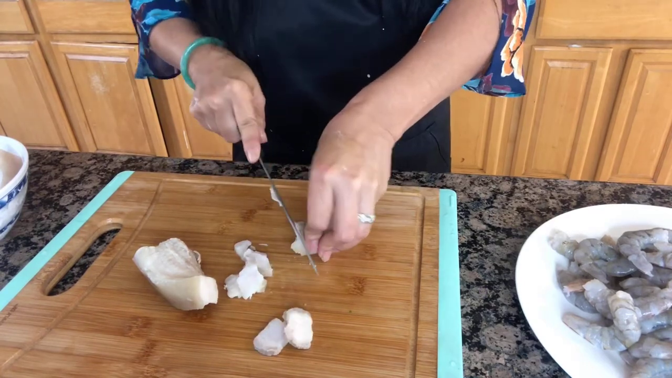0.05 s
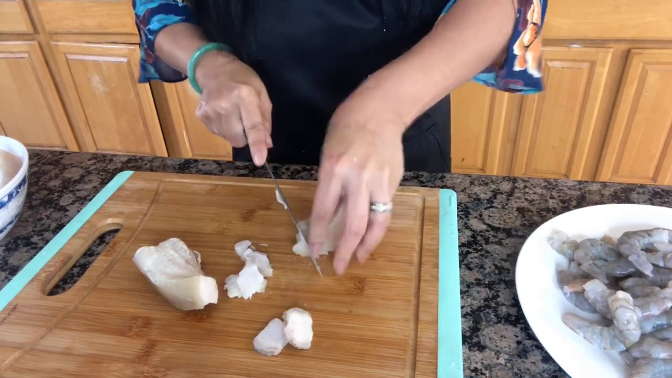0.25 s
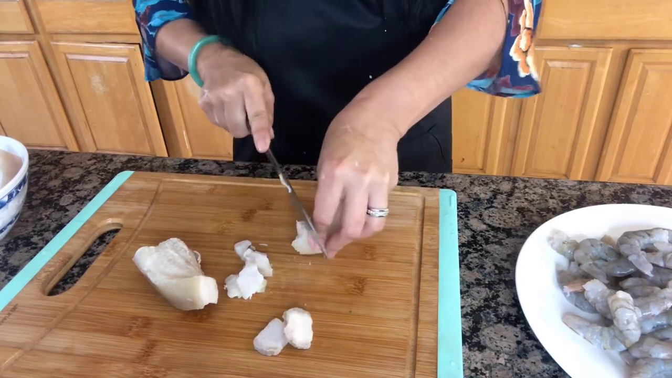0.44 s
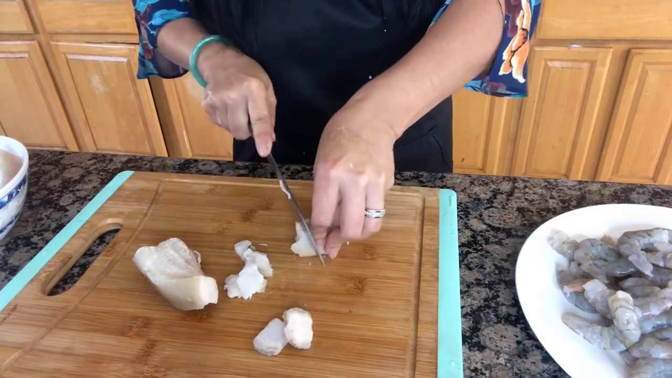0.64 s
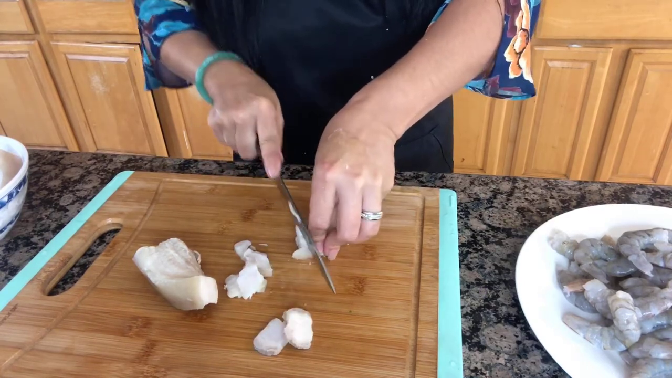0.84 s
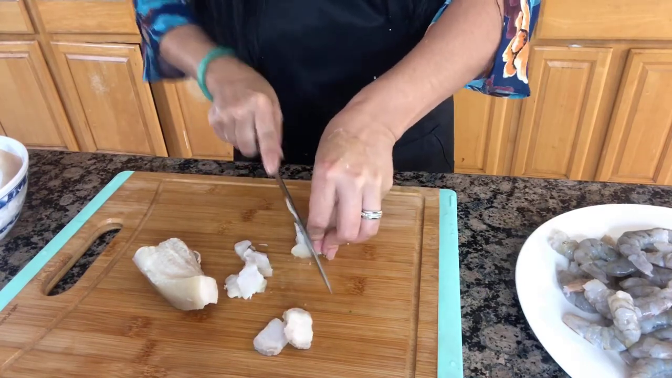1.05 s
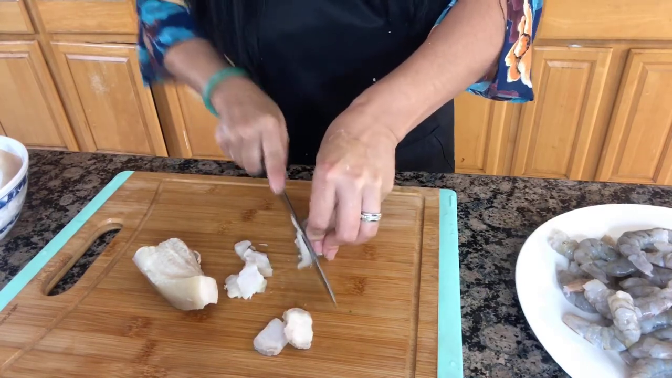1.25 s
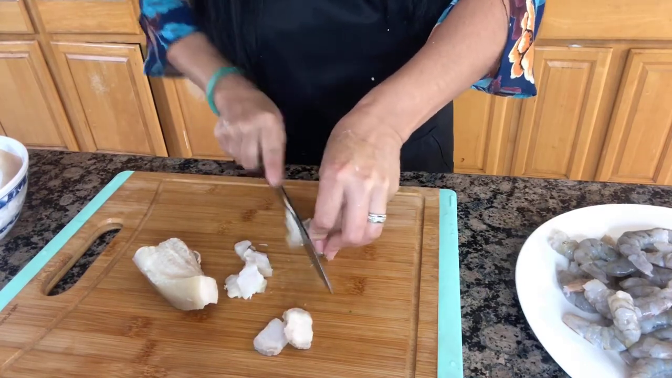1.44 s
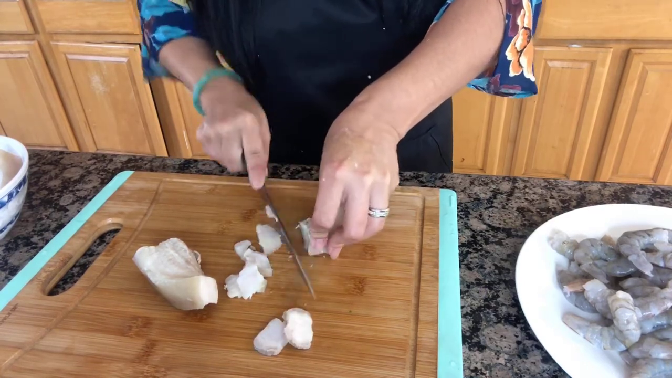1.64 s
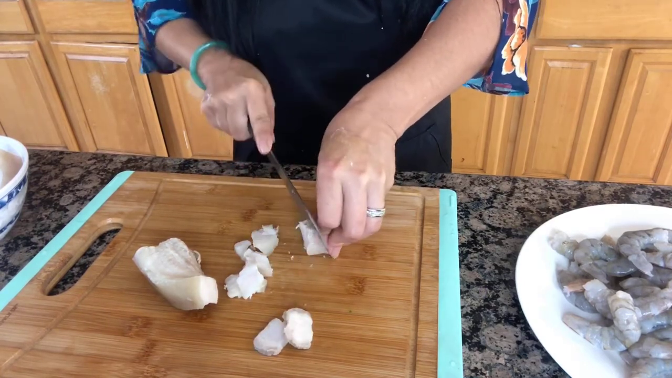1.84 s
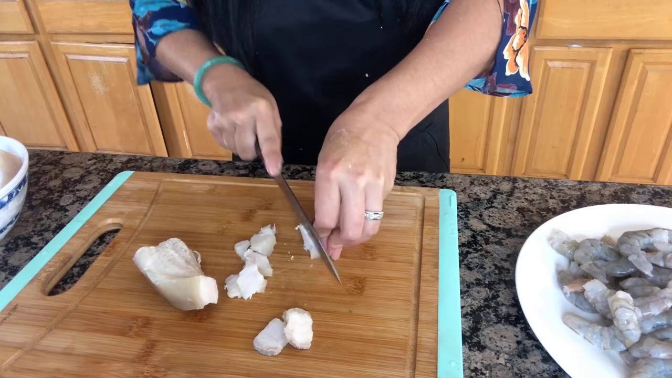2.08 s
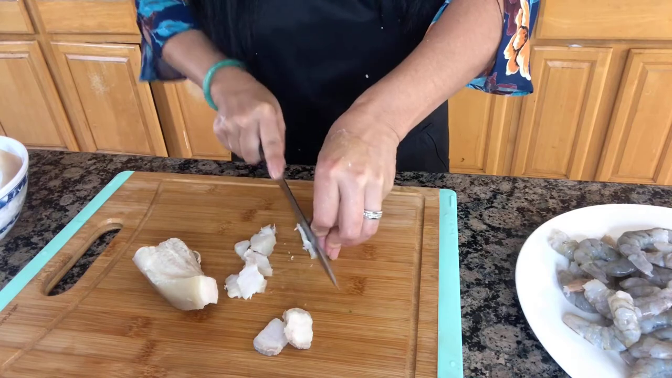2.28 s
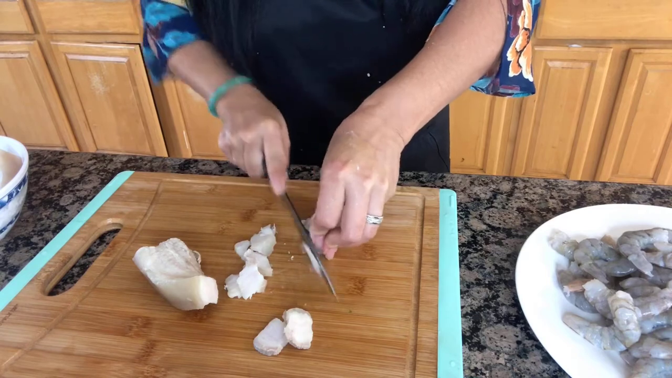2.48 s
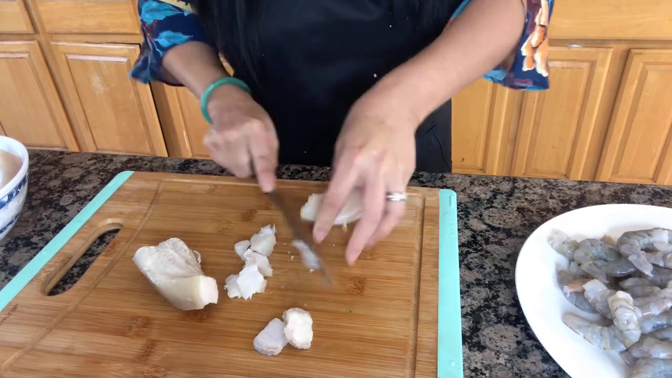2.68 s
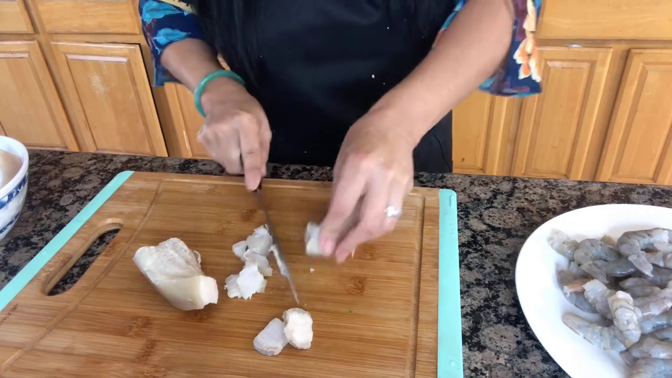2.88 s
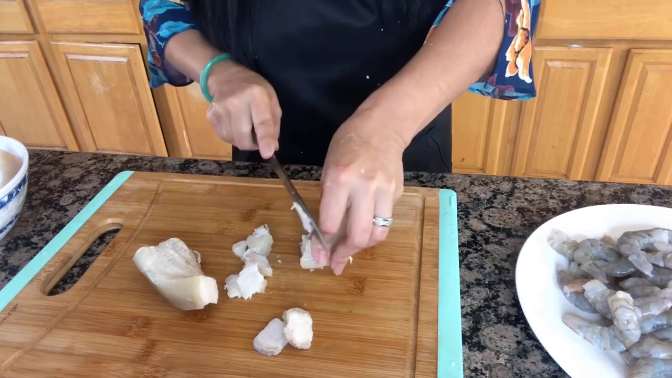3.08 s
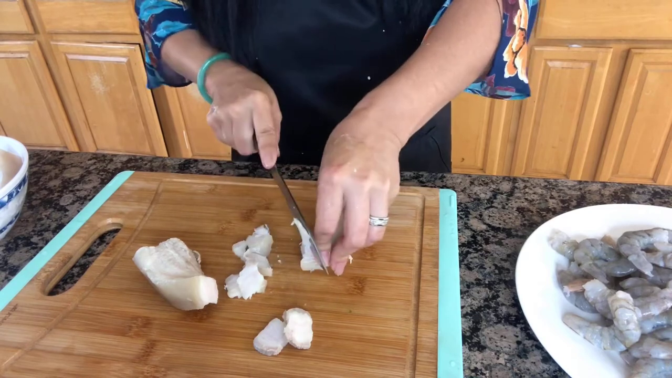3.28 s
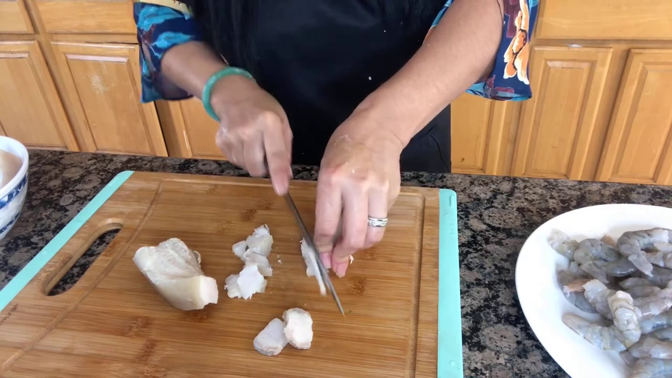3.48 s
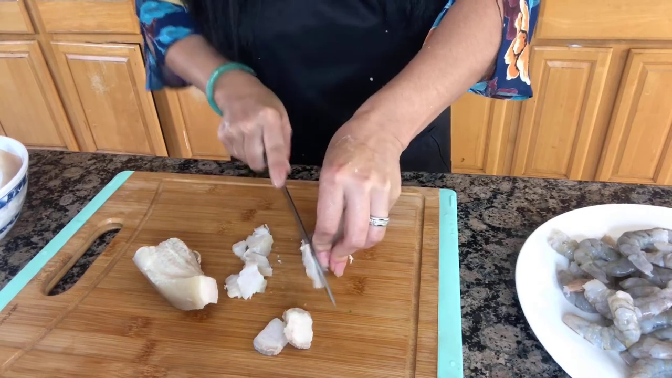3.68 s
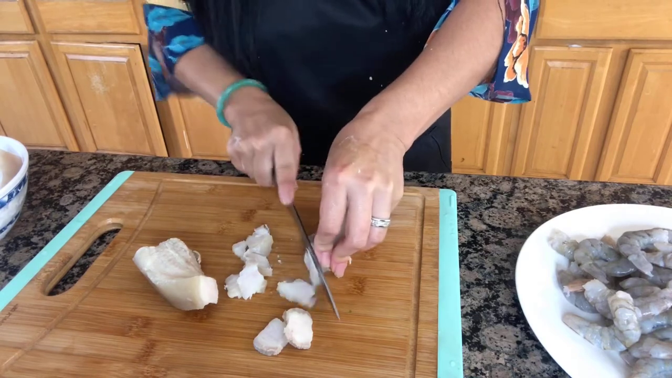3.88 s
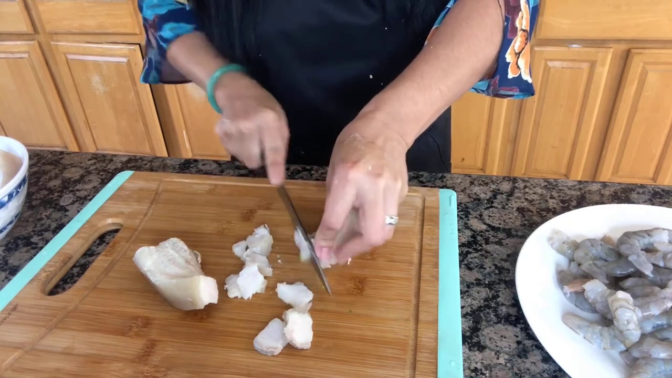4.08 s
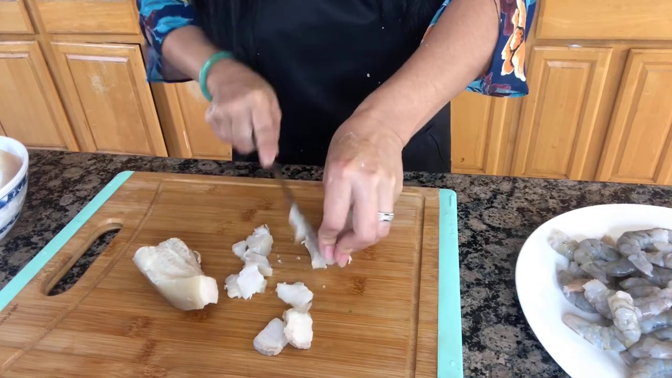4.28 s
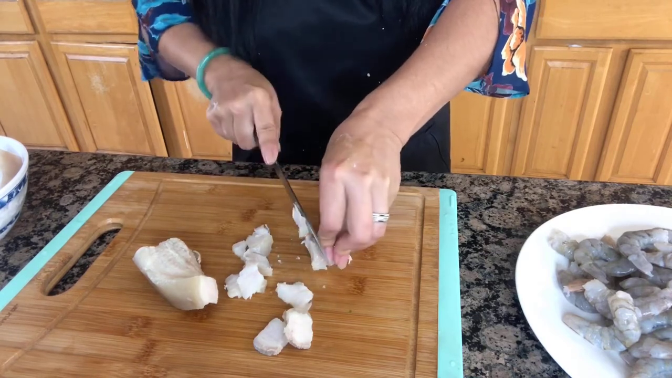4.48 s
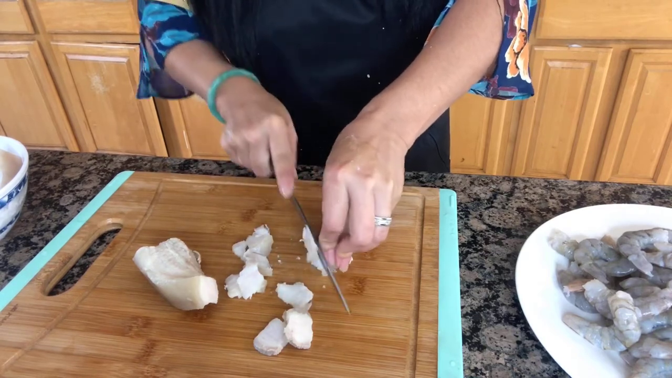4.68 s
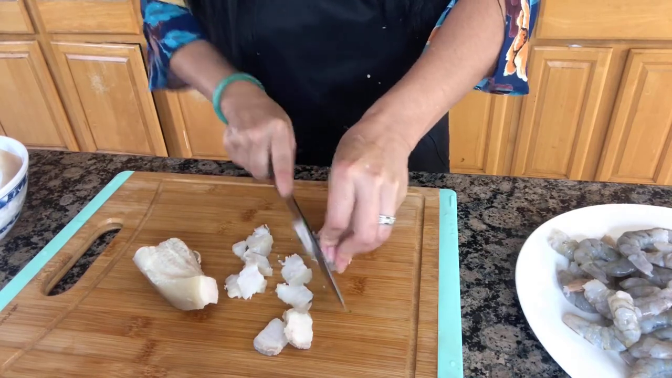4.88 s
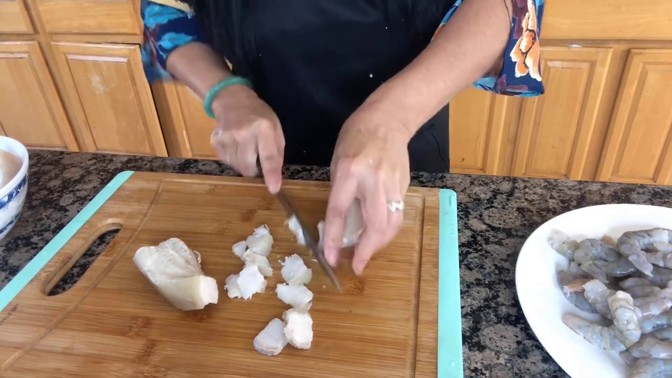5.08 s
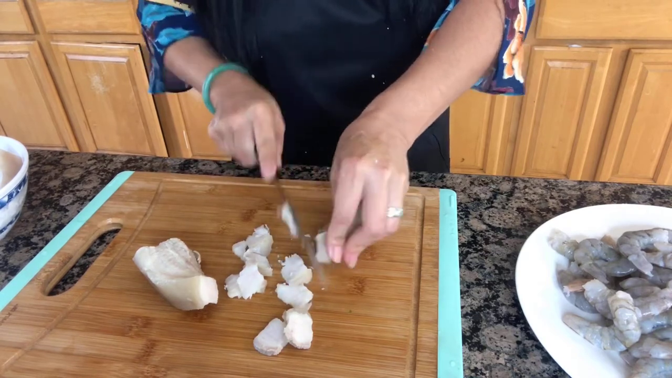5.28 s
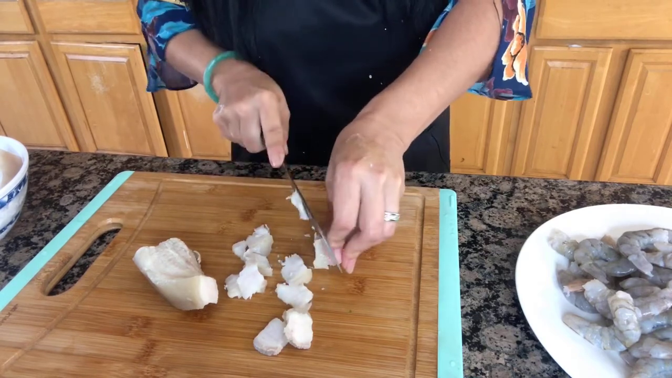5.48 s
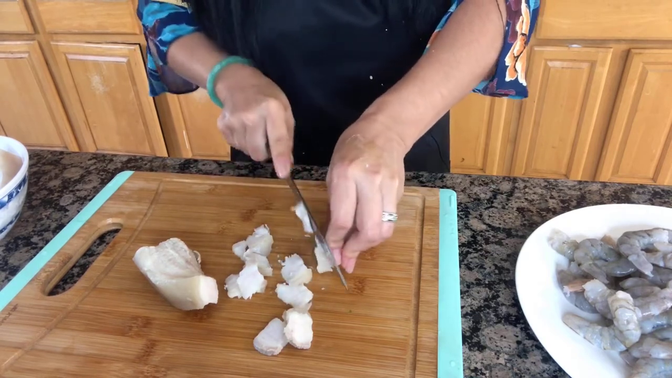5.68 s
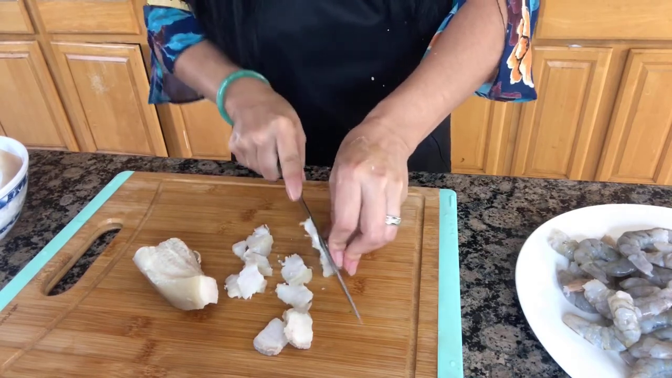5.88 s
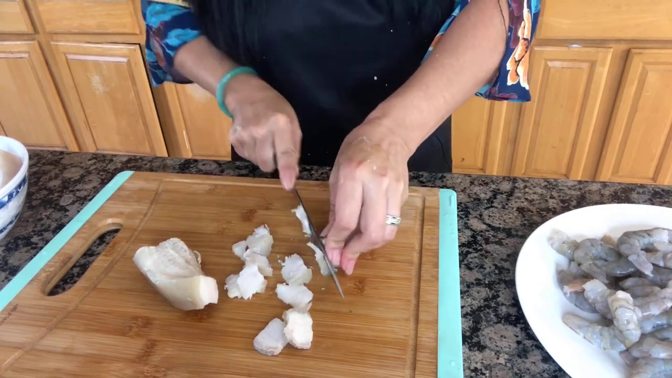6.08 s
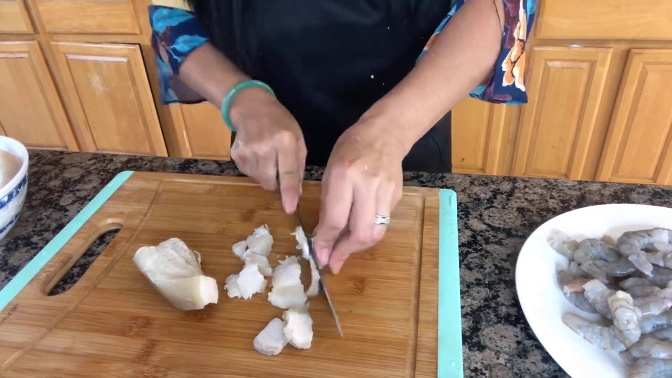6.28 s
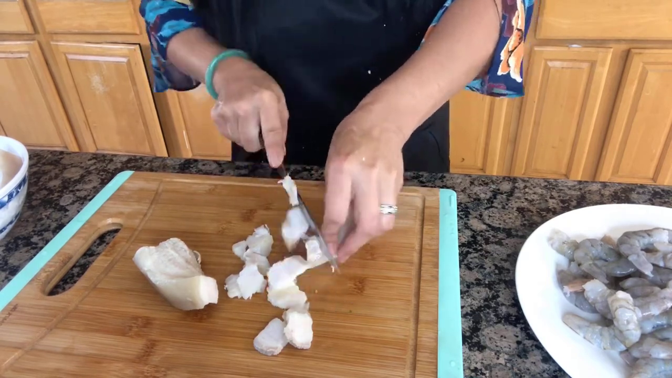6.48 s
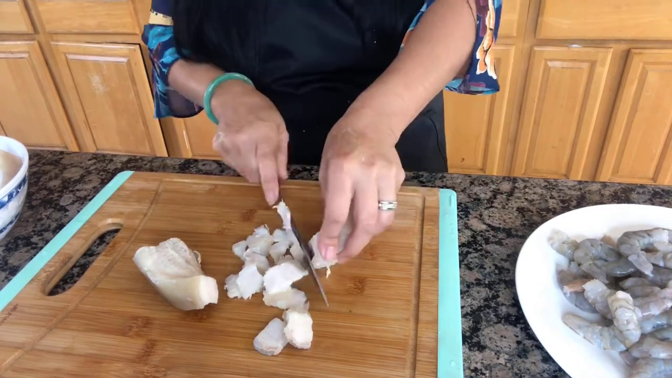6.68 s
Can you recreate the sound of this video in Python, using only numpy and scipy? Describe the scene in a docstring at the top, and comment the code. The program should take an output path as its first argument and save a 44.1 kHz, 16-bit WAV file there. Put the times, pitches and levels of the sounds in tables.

```python
"""Knife work on a bamboo board

A chef's knife slices cooked pork in a kitchen, over a faint appliance hum of noise and wavering tones.
Parting fibres are random impulses (a soft wet crackle); the edge meeting the wood excites modes (a knock);
stick-slip drives resonances as the edge scrapes to and fro. Crackle and scrape follow the blade's speed.
All sound stops shortly before the end."""
import sys
import numpy as np
from scipy import signal
from scipy.fft import rfft, irfft
from scipy.io import wavfile
from scipy.ndimage import map_coordinates

SR = 44100
rng = np.random.default_rng(int(sys.argv[2]) if len(sys.argv) > 2 else 0)


def unload_wav(signal):
    """Save mono or channel-first audio to the path in sys.argv[1] as 16-bit WAV at rate SR, clipped to [-1, 1]."""
    wavfile.write(
        sys.argv[1],
        SR,
        np.round(np.clip(np.atleast_2d(signal).T, -1, 1) * 32767).astype(np.int16),
    )


N = 297228
TIME = np.arange(N) / SR  # s


def gain_of(db):
    """Logarithmic level: decibels to amplitude."""
    return 10 ** (np.asarray(db) / 20)


def evened(x):
    """Normalization: scales to rms 1."""
    return x / np.sqrt(np.mean(x ** 2) + 1e-20)


def read(points, hz):
    """Logarithmic pitch: interpolates a table on a log-frequency axis."""
    f, value = np.transpose(points)
    return np.interp(np.log(hz + 1), np.log(f + 1), value)


def add(mix, s, sound):
    """Superposition: adds a sound to the mix from time s [s]."""
    part = mix[round(s * SR):][:len(sound)]
    part += sound[:len(part)]


def filtered(x, hz, kind, order=2):
    """Causal filtering: a Butterworth low-pass or high-pass."""
    corner_hz = min(hz, SR / 2 - 1)
    return signal.sosfilt(signal.butter(order, corner_hz, kind, fs=SR, output="sos"), x)


def tinted(x, spectrum):
    """Spectral shaping: weights a steady signal by frequency, at rms 1."""
    size = x.shape[-1]
    gain = gain_of(read(spectrum, np.fft.rfftfreq(size, 1 / SR)))
    return evened(irfft(rfft(x) * gain, size))


def drift(rate_hz, size=N):
    """Random modulation: a slow interpolated random curve at about rms 1."""
    steps = np.arange(size) * 2 * rate_hz / SR
    knots = rng.standard_normal(4096)
    return np.sqrt(3 / 2) * np.interp(steps, np.arange(len(knots)), knots)  # interpolation lowers the rms


# Left-right likeness of the background noise: (frequency [Hz], likeness [0-1])
LIKENESS = [(30, 0.37), (150, 0.97), (300, 0.2), (700, 0.68), (1500, 0.79), (5000, 0.76), (15000, 0.28)]


def noise_pair(spectrum):
    """Partial coherence: left and right noise share a frequency-dependent part."""
    same = np.clip(read(LIKENESS, np.fft.rfftfreq(N, 1 / SR)), 0, 1)
    left, other = rfft(rng.standard_normal((2, N)))
    right = same * left + np.sqrt(1 - same ** 2) * other
    return tinted(irfft(np.array([left, right]), N), spectrum)


# Spectrum of the rushing air: (frequency [Hz], relative density [dB per Hz])
AIR_SPECTRUM = [(74, -36), (125, -6), (147, 0), (216, -9), (244, -4), (359, -6), (528, -8), (661, -14),
                (914, -11), (1260, -14), (2280, -32), (3350, -30), (3860, -34), (14800, -43), (16000, -48)]
# Hum lines of the appliance: (frequency [Hz], relative level [dB])
HUM_LINES = [(39, -73), (59.2, -63), (119, -71.5), (146, -92), (157, -60), (196, -67.5), (296, -59),
             (355, -60.5), (533, -72), (710, -63.5), (920, -70.5)]
# Faint deep rumble that comes and goes: (time [s], level [dB])
RUMBLE_LEVEL = [(0.0, -65), (0.07, -61), (1.12, -64), (1.53, -56), (2.16, -58.5), (2.63, -43.5),
                (3.26, -58), (3.57, -56), (3.91, -62), (3.99, -52), (4.23, -48), (4.48, -58), (5.13, -48.5),
                (5.37, -53), (5.79, -56), (6.1, -63)]
# Spectra of drone and rumble: (frequency [Hz], relative density [dB per Hz])
DRONE_SPECTRUM = [(10, -11), (40, -3.5), (65, -0.5), (100, 0), (400, -28), (2000, -78.5)]
RUMBLE_SPECTRUM = [(5, -13.5), (15, 0.5), (30, -15), (70, -27.5), (300, -67.0)]


def background(air_db=-45, hum_db=-1, waver_hz=1.3, drone_db=-67):
    """Broadband and tonal noise: an appliance's air, drone and wavering hum, over a deep rumble."""
    out = gain_of(air_db) * noise_pair(AIR_SPECTRUM) + gain_of(drone_db) * noise_pair(DRONE_SPECTRUM)
    for hz, db in HUM_LINES:
        level = gain_of(db + hum_db + 2 * drift(rate_hz=6.3))
        turns = np.cumsum(hz + waver_hz * drift(rate_hz=12)) / SR
        out = out + level * np.sqrt(2) * np.sin(2 * np.pi * turns)
    rumble_db = np.interp(TIME, *np.transpose(RUMBLE_LEVEL))
    return out + noise_pair(RUMBLE_SPECTRUM) * gain_of(rumble_db)


def slips(per_s, spread_db, size=N):
    """Random point process: a train of tiny impulses of uneven size and either sign."""
    height = gain_of(spread_db * np.minimum(rng.exponential(1, size), 4))
    return height * rng.choice([-1, 1], size) * (rng.random(size) < per_s / SR)


def speed(rise_s, fall_s):
    """Stroke kinematics: blade speed, 0-1, gathers from rest and slows to rest along a sine."""
    t = np.arange(0, rise_s + fall_s, 1 / SR)
    return np.sin(np.interp(t, [0, rise_s, rise_s + fall_s], [0, np.pi / 2, np.pi]))


# Loudest small snaps and ticks: wet meat, and bright ticks as the edge lands:
# (time [s], peak level [dB], lowest frequency [Hz], highest frequency [Hz], decay constant [s])
SNAPS_AND_TICKS = [(0.137, -35, 8500, 16000, 0.0023), (0.218, -42, 1930, 4940, 0.013),
                   (0.274, -40.5, 1960, 5470, .005), (0.3, -44, 9000, 16000, .003),
                   (1.0175, -34.5, 4000, 14100, .0015), (1.1008, -33.5, 2500, 8750, 0.0012),
                   (1.1868, -33, 1640, 7000, 0.00083), (1.2291, -18, 6800, 14600, 0.0007),
                   (1.2379, -18.5, 4000, 15000, 0.00066), (2.2973, -26, 1500, 7000, 0.00093),
                   (3.797, -37, 1500, 5970, .002), (3.858, -26, 1490, 4520, .003),
                   (3.8629, -14, 2500, 12200, 0.00097), (5.717, -41, 10000, 16000, .001)]
# Passes of the blade through the meat:
# (start [s], speeding up [s], slowing down [s], relative crackle level [dB])
MEAT_PASSES = [(.6, 0.14, .1, -64.5), (1.015, 0.039, .085, -51.5), (1.11, .1, 0.043, -51),
               (1.96, .12, 0.14, -62.5), (2.245, 0.098, 0.037, -45), (3.38, 0.066, .12, -65),
               (3.575, .11, 0.091, -53.5), (3.755, 0.041, 0.16, -50.5), (4.49, 0.12, 0.1, -58),
               (4.665, 0.046, 0.013, -48), (5.52, .28, .14, -61), (5.87, 0.15, 0.045, -49)]
# Spectrum of the parting meat: (frequency [Hz], relative density [dB per Hz])
MEAT_SPECTRUM = [(300, -28), (1500, 7), (3000, 0), (5800, 0.5), (8000, -3.5), (12000, -1.5), (16000, -11)]
CRACKLE_LAW = 0.98  # amplitude grows as this power of the blade's speed
SNAPS_PER_S, SNAP_SPREAD_DB = 70, 2.2  # small random snaps under the same level curve as the crackle
# A faint bright hiss lies under each scrape, starting earlier and ending later
HISS_DB, HISS_LEAD_S, HISS_LAG_S = -24, 0.056, 0.13


def meat(crackle_db=-2, small_snap_db=-5, small_decay_s=0.001):
    """Fracture noise: fibres crackle with blade speed; larger snaps, ticks and a faint hiss join in."""
    cutting, t = np.zeros(N), np.arange(SR // 25) / SR
    for s, rise_s, fall_s, db in MEAT_PASSES:
        add(cutting, s, gain_of(db) * speed(rise_s, fall_s) ** CRACKLE_LAW)
    for s, rise_s, fall_s, db, *_ in SCRAPE_STROKES:
        hiss = speed(rise_s + HISS_LEAD_S, fall_s + HISS_LAG_S)
        add(cutting, s - HISS_LEAD_S, gain_of(db + HISS_DB) * hiss)

    crackle = tinted(slips(per_s=2000, spread_db=0.5), MEAT_SPECTRUM)
    tears = abs(slips(SNAPS_PER_S, SNAP_SPREAD_DB))
    tears = signal.fftconvolve(tears, np.exp(-t / small_decay_s))[:N]
    small_snaps = tinted(tears * rng.standard_normal(N), MEAT_SPECTRUM)
    out = cutting * (gain_of(crackle_db) * crackle + gain_of(small_snap_db) * small_snaps)

    for s, db, low_hz, high_hz, decay_s in SNAPS_AND_TICKS:
        burst = rng.standard_normal(len(t)) * np.exp(-t / decay_s)
        snap = filtered(filtered(burst, low_hz, "high", order=3), high_hz, "low", order=3)
        add(out, s, gain_of(db) * snap / abs(snap).max())
    return out


def ring(hz, t60, travel=0.00062):
    """Modal decay with dispersion: bending waves of low notes arrive later; travel [s] is for 1000 Hz."""
    t = np.maximum(np.arange(SR // 5) / SR - travel * np.sqrt(1000 / hz), 0)
    return gain_of(-60 * t / t60) * np.sin(2 * np.pi * hz * t)


def click(spectrum, size=2048):
    """Minimum phase: the shortest causal pulse with this spectrum, at peak 1."""
    log_gain = np.log(gain_of(read(spectrum, abs(np.fft.fftfreq(size, 1 / SR)))))
    pulse = np.fft.ifft(np.exp(signal.hilbert(log_gain))).real[:size // 2]
    return pulse / abs(pulse).max()


# Modes of the board, before contact damps them: (frequency [Hz], relative level [dB], t60 [s])
BOARD_MODES = [(555.5, -25.5, 0.233), (832, -23.5, 0.16), (950, -27.5, .05), (1070.5, -14, 0.075),
               (1060, -22.5, 0.09), (1442, -23.5, 0.095), (1550, -19, 0.07), (1570, -31, 0.1),
               (1760, -20.5, 0.086), (1888, -6.5, 0.029), (2140, -19.5, 0.099), (2314, 1, 0.0075),
               (2364, -0.5, 0.015), (2960, -27.5, .08), (3440, -31, .07), (3700, -21.5, 0.034),
               (4300, -11.5, 0.02), (4974, -11, 0.018)]


def board(hard_hz, pressed=1.25):
    """Modal excitation: a soft blow weakens high modes, and the pressing edge shortens the ring."""
    out = 0
    for hz, db, t60 in BOARD_MODES:
        out = out + gain_of(db) * ring(hz, t60 / pressed) / np.hypot(1, (hz / hard_hz) ** 2)
    return out


# Edge meets board: (time [s], relative force [dB], hardness as a corner frequency [Hz],
# blade rebound note [Hz], relative rebound level [dB], relative crack level [dB])
EDGE_KNOCKS = [(1.2378, -23, 2000, 497, 5, -6), (1.538, -28, 1200, 600, 5, -10),
               (1.597, -22.5, 600, 420, 8, -9), (1.611, -22, 600, 474, 4.5, -20),
               (2.3615, 0.5, 3185, 900, 0.5, 3), (2.682, -27.5, 1490, 556, 10.5, -12),
               (3.8558, -21.5, 2150, 1660, 9.5, -6.5), (3.8622, -31, 2466, 1005, 12.5, 6),
               (4.7106, -2, 4200, 1460, 3.5, 12), (4.7123, -13.5, 4000, 1820, 14, 7.5),
               (5.0842, -19, 2560, 1790, 4.5, -12), (5.106, -12.5, 800, 470, -3, -25),
               (6.0523, -17.5, 1400, 806, -1.5, -10)]
# Spectrum of the crack: (frequency [Hz], relative density [dB per Hz])
CRACK_SPECTRUM = [(200, -30), (1000, -2.5), (2500, 1.5), (5500, 0.5), (8000, -2), (12000, -9),
                  (16000, -18.5)]


def knocks(rebound_t60=0.021, rebound_db=-4, crack_reach=1.27, lowest_hz=450):
    """Impact: the edge cracks onto the wood, the board rings and the blade shudders against it."""
    out, crack = np.zeros(N), click(CRACK_SPECTRUM)
    for s, db, hard_hz, note_hz, note_db, crack_db in EDGE_KNOCKS:
        blow = board(hard_hz) + gain_of(note_db + rebound_db) * ring(note_hz, rebound_t60)
        add(blow, 0, gain_of(crack_db) * crack)
        add(out, s, gain_of(db) * filtered(blow, crack_reach * hard_hz, "low"))
    return filtered(out, lowest_hz, "high", order=4)  # a small board radiates little bass


def rubbed(grain, modes, hard_hz, shift_db=0.5, detune=0.02):
    """Friction-driven modes: slips keep them ringing, grip damps and detunes, moving contact swells them."""
    out = np.zeros(len(grain))
    for hz, db, t60 in modes:
        mode = ring(hz * (1 + detune * rng.uniform(-1, 1)), t60 / 2)[:SR // 12]
        ringing = evened(signal.fftconvolve(grain, mode)[:len(grain)])
        level = gain_of(db + shift_db * drift(rate_hz=18, size=len(grain)))
        out += ringing * level / np.hypot(1, (hz / hard_hz) ** 3)
    return evened(out)


def resonate(x, hz, width_hz):
    """Time-varying resonance: a two-pole filter, shifted to follow the frequency curve hz."""
    turn, r = np.exp(2j * np.pi * np.cumsum(hz) / SR), np.exp(-np.pi * width_hz / SR)
    return (turn * signal.lfilter([1], np.poly([r, r]), x / turn)).real


# Each slip is also heard by a short reflection off the board:
# mean delay [s], share of glide and spread, echo gain
BOARD_PATH_S, PATH_GLIDE, PATH_GAIN = 0.00115, 0.1, 0.35


def combed(x, delay_s):
    """Comb interference: one echo with a moving delay makes a row of gliding resonances."""
    return x + PATH_GAIN * map_coordinates(x, [np.arange(len(x)) - delay_s * SR], order=3)


# Strokes of the edge along the wood: (start [s], speeding up [s], slowing down [s], relative level [dB],
# relative board rumble [dB], relative fizz [dB], nominal contact resonance [Hz])
SCRAPE_STROKES = [(1.238, 0.003, 0.068, -36.5, -8, -9.5, 1700), (1.336, 0.065, 0.091, -35, -8, -8, 1950),
                  (1.528, 0.037, 0.062, -35, 7.5, -5, 1650), (2.375, 0.054, 0.085, -33, -1, -10, 2050),
                  (2.535, 0.048, 0.083, -45.5, 4.5, -9, 1800), (2.605, 0.081, 0.081, -39.5, 4.5, -5, 1600),
                  (3.863, 0.02, 0.03, -43, 5, -6, 1750), (3.945, 0.071, 0.081, -35.5, -0.5, -9, 1850),
                  (4.119, 0.0058, 0.042, -38.5, 4.5, -9, 1800), (4.725, 0.017, .08, -40, 4.5, -19, 1780),
                  (4.795, 0.053, 0.12, -35, 1, -7.5, 1750), (4.988, 0.094, 0.037, -38, 6, -8, 1900),
                  (5.982, 0.02, 0.021, -45, -4, -3, 1700), (6.058, 0.043, 0.045, -40, -19, -6.5, 1920)]
# Spectra of the scraping edge, rasp and fizz: (frequency [Hz], relative density [dB per Hz])
RASP_SPECTRUM = [(100, -32.5), (500, -21), (900, 8), (1350, 11), (1750, 5.5), (2500, -0.5), (3100, 4),
                 (4600, -1.5), (5400, -22), (7000, -32.5), (16000, -39.5)]
FIZZ_SPECTRUM = [(1000, -34), (4000, 2), (6300, 7.5), (8000, 2), (9800, 2.5), (12000, -6.5), (16000, -12.5)]
# Modes of the blade, before the grip damps them: (frequency [Hz], relative level [dB], t60 [s])
BLADE_MODES = [(1350, 4.5, 0.042), (1880, 2, 0.012), (2445, 12.5, 0.014), (2787, 3.5, 0.016),
               (3080, -1.5, 0.031), (4350, -17.5, 0.015), (5000, -1.5, 0.017), (6200, -10.5, 0.0098),
               (6550, -33.5, 0.018), (6840, -26, .014), (9700, -9.5, 0.016), (10800, -8, 0.018),
               (11060, -23, .008), (12490, -10, 0.012), (13600, -18, .005)]
RASP_LAW = 0.98  # amplitude grows as this power of the blade's speed
CONTACT_SAG = 0.076  # share by which the contact resonance lies lower when the blade is at rest
CONTACT_WANDER = 0.099  # rms share by which it wanders as the contact travels along the edge
OVERTONE, OVERTONE_DB = 2.15, -12  # second contact resonance: multiple of the first, relative level
# The hand leans in: over a stroke the board rumble grows and the contact resonance falls by this share
LEAN_DB, CONTACT_FALL = 11.5, 0.2


def scrapes(rasp_db=-6.0, blade_db=-4, contact_db=-3, contact_width_hz=600, body_db=-5.0, fizz_db=-2.0,
            chatter_db=1.4, lowest_hz=330):
    """Stick-slip friction: slips over the grain excite rasp, fizz, blade, board and contact resonances."""
    out = np.zeros(N)
    for s, rise_s, fall_s, db, over_body, over_fizz, contact_hz in SCRAPE_STROKES:
        pace = speed(rise_s, fall_s)
        size = len(pace)
        along = np.linspace(-0.5, 0.5, size)  # progress through the stroke
        grain, fine, coarse, edge = (slips(per_s=10000, spread_db=1.0, size=SR // 3) for _ in range(4))
        rasp = gain_of(rasp_db) * tinted(grain, RASP_SPECTRUM)
        rasp += gain_of(blade_db) * rubbed(fine, BLADE_MODES, hard_hz=18550)
        fizz = tinted(grain, FIZZ_SPECTRUM)
        body = rubbed(coarse, BOARD_MODES, hard_hz=767)
        rasp, fizz, body, edge = (layer[:size] for layer in (rasp, fizz, body, edge))

        wander = CONTACT_WANDER * drift(rate_hz=15, size=size)
        hz = contact_hz * (1 - CONTACT_SAG * (1 - pace) - CONTACT_FALL * along + wander)
        contact = evened(resonate(edge, hz, contact_width_hz))
        contact += gain_of(OVERTONE_DB) * evened(resonate(edge, OVERTONE * hz, contact_width_hz))

        sound = rasp + gain_of(contact_db) * contact
        sound += gain_of(fizz_db + over_fizz) * fizz
        sound += gain_of(body_db + over_body + LEAN_DB * along) * body
        glide = rng.choice([-1, 1]) * along + rng.uniform(-1.1, 1)
        sound = combed(sound, BOARD_PATH_S * (1 + PATH_GLIDE * glide))
        chatter = chatter_db * drift(rate_hz=90, size=size)
        add(out, s, sound * pace ** RASP_LAW * gain_of(db + chatter))
    return filtered(out, lowest_hz, "high", order=3)


# The edge catches and squeaks: (start [s], level before the swell [dB rms], frequency [Hz], length [s])
EDGE_SQUEAKS = [(1.554, -37.5, 6250, 0.034), (2.678, -32.5, 3500, 0.025), (2.67, -41, 4880, 0.028),
                (4.835, -37, 3800, 0.016)]


def squeaks(waver_hz=70):
    """Friction locking: for a moment the slips lock into one unsteady note."""
    out = np.zeros(N)
    for s, db, hz, length_s in EDGE_SQUEAKS:
        swell = np.hanning(round(length_s * SR))
        turns = np.cumsum(hz + waver_hz * drift(rate_hz=420, size=len(swell))) / SR
        add(out, s, gain_of(db) * np.sqrt(2) * swell * np.sin(2 * np.pi * turns))
    return out


# Reverberation of the kitchen: (frequency [Hz], t60 [s])
KITCHEN_T60 = [(200, 0.21), (1000, 0.41), (2500, .3), (6000, 0.18), (15000, 0.42)]
# First reflections: (mean delay [s], relative gain [amplitude ratio])
FIRST_ECHOES = [(.0027, 0.022), (.0058, 0.027), (.0083, 0.16), (.0108, 0.071), (.0162, .05), (.0247, 0.089)]


def kitchen(x, tail_db=-12, echo_db=-1, echo_hz=4500, spread_s=0.00007, shared=1.6):
    """Reflection and reverberation: counter and cupboards return dull echoes and a short diffuse tail."""
    taps = rng.standard_normal((3, SR // 2))
    pair = taps[:2] + shared * taps[2]  # partly alike left and right
    hz, t, z = signal.stft(pair, SR, nperseg=256)
    decay = gain_of(-60 * t / read(KITCHEN_T60, hz)[:, None])
    tail = signal.istft(z * decay, SR, nperseg=256)[1]
    tail = tail * np.minimum(np.arange(tail.shape[1]) / SR / 0.00097, 1)  # onset ramp
    answer = gain_of(tail_db) * tail / np.linalg.norm(tail[0])
    for k, (delay_s, gain) in enumerate(FIRST_ECHOES):
        for ear, side in zip(answer, (-1, 1)):  # echoes come from left and right in turn
            arrival_s = abs(delay_s + side * (-1) ** k * spread_s)
            add(ear, arrival_s, np.array([gain * gain_of(echo_db)]))
    answer = filtered(answer, echo_hz, "low", order=1)
    return x + signal.fftconvolve(x[None], answer, axes=1)[:, :N]


# The two microphone ports as seen from the board:
# (frequency [Hz], left over right [dB])
PORT_LEVELS = [(100, -2), (1300, 1.7), (2400, 1.4), (4400, 1.5), (8000, 2), (15000, -0.5)]
# (frequency [Hz], phase by which left leads [rad])
PORT_LEAD = [(100, 1), (6000, 0.22), (7700, 1), (10000, 0.019), (16000, .4)]


def ports(pair):
    """Interchannel difference: two microphone ports hear the board with unlike level and phase."""
    hz = np.fft.rfftfreq(N, 1 / SR)
    half = gain_of(read(PORT_LEVELS, hz) / 2) * np.exp(0.5j * read(PORT_LEAD, hz))
    return irfft(rfft(pair) * np.array([half, 1 / half]), N)


def scene(air_left_db=0.5):
    """Superposition: knife work in the kitchen, over a background that lies a little to the left."""
    knife = ports(kitchen(meat() + knocks() + scrapes() + squeaks()))
    return knife + background() * gain_of(air_left_db * np.array([[1], [-1]]))


STOP_S, BAND_EDGE_HZ = 6.128, 16200  # end of all sound, upper band limit


def record(dry):
    """Saturation and band limiting: hard knocks overload, the sound stops, then a low-pass acts."""
    clipped = dry / (1 + dry ** 6) ** (1 / 6) * (TIME < STOP_S)
    low_pass = signal.firwin(255, BAND_EDGE_HZ, window=("kaiser", 8), fs=SR)
    return signal.oaconvolve(clipped, low_pass[None], "same")


dry = scene()
out = record(dry)
unload_wav(out)
```